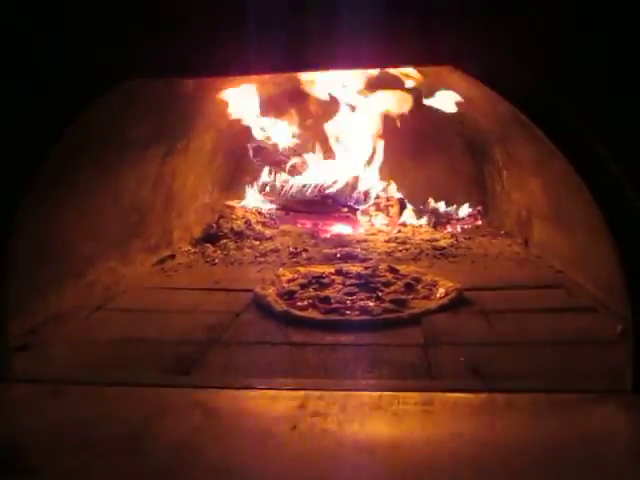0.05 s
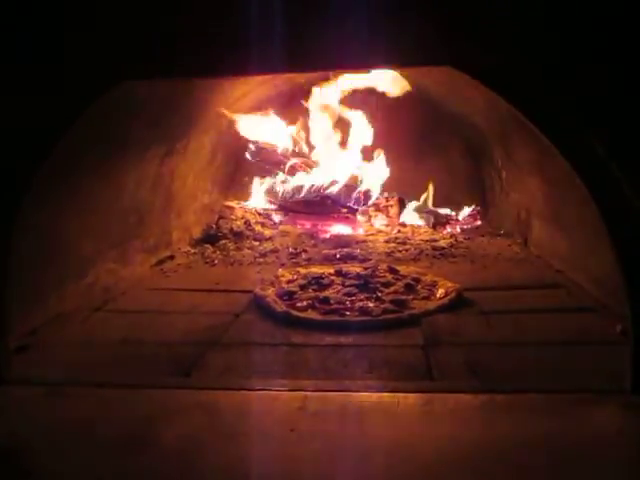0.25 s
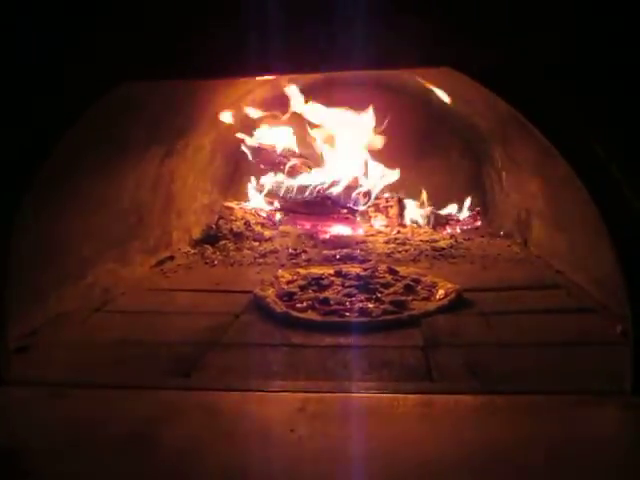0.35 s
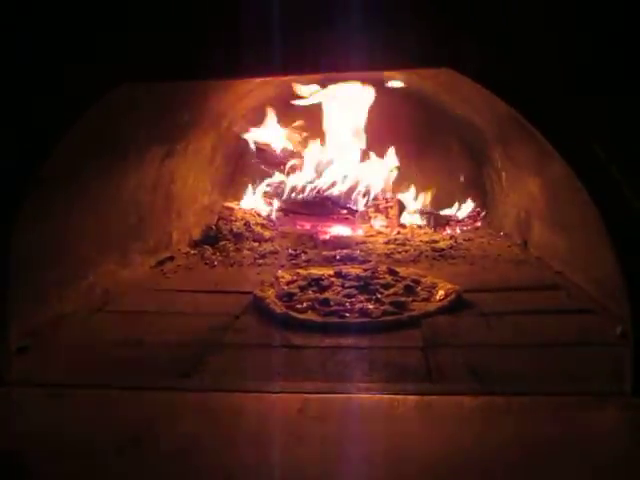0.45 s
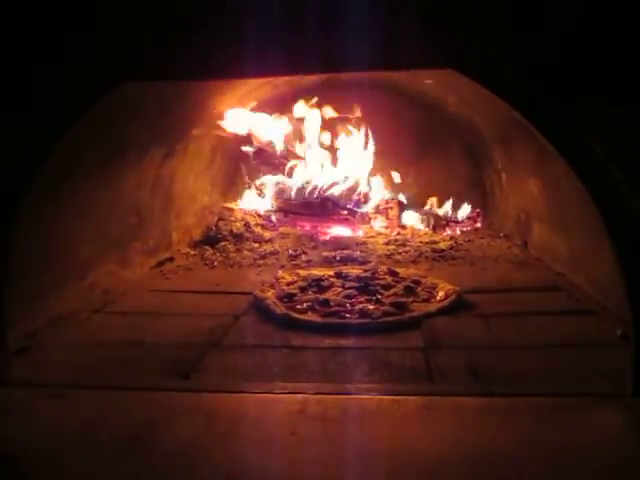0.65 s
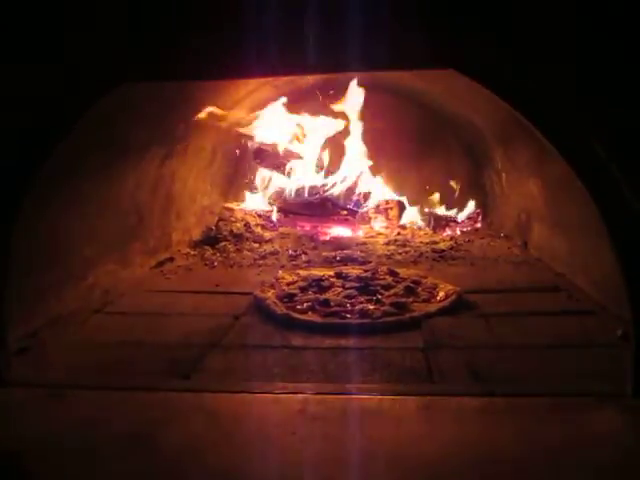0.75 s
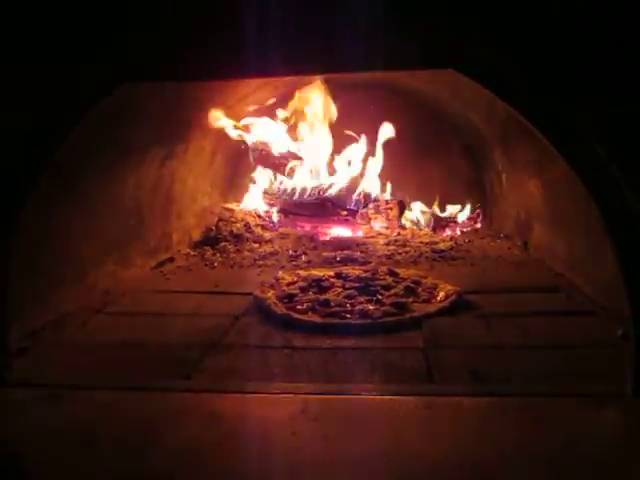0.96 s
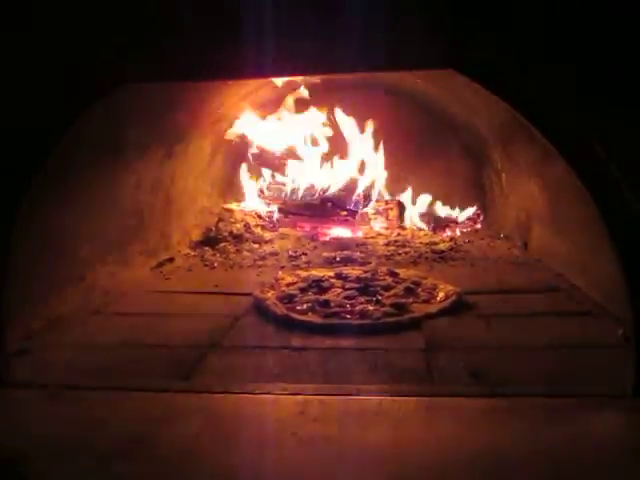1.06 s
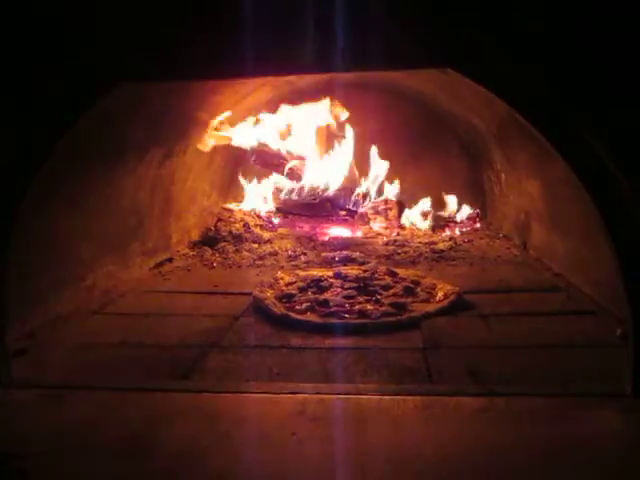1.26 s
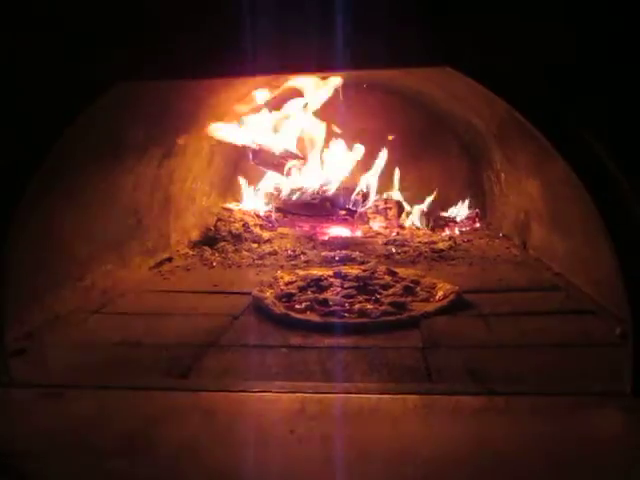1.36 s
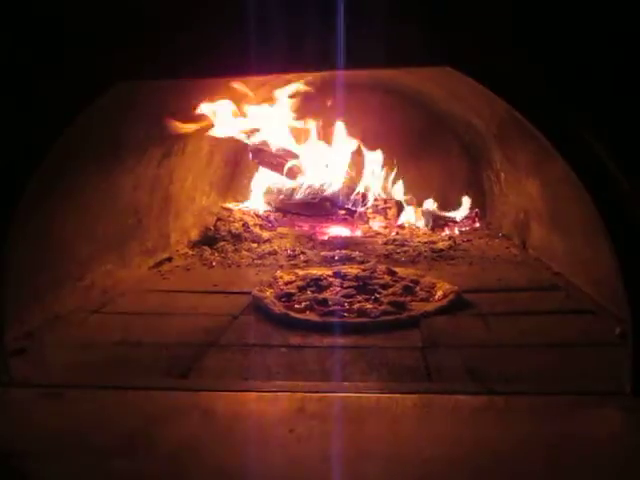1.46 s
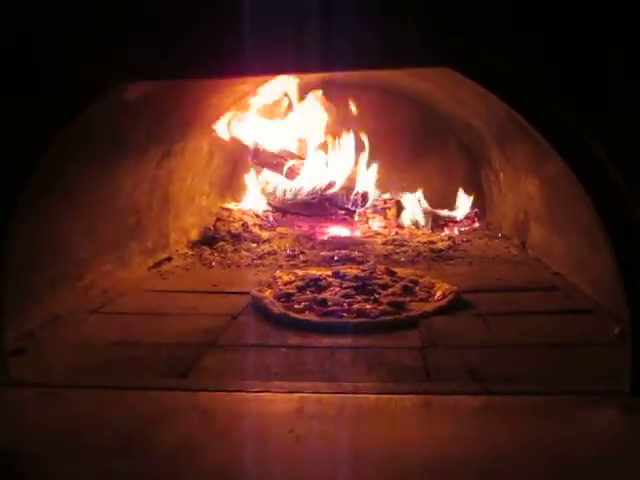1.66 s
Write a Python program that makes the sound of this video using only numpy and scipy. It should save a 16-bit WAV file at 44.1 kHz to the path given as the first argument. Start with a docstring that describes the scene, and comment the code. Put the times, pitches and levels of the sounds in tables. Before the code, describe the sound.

A wood fire crackles in a brick oven, with two very loud log pops early on

```python
"""In a domed brick oven burns a wood fire: low roar, soft hiss and fine sizzle, as filtered noise and ticks.
A log pops twice, very loudly, among smaller crackles; each is a spike, a noise burst and decaying echoes,
filtered by the resonances of the wood. The flames are stereo noise that follows a slow draught.
Gain control ducks the fire at the pops and lets it swell back over about a second; loud peaks clip."""
import sys
import numpy as np
from scipy import signal
from scipy.fft import rfft, irfft, next_fast_len
from scipy.io import wavfile
from scipy.ndimage import uniform_filter1d

SR = 44100
rng = np.random.default_rng(int(sys.argv[2]) if len(sys.argv) > 2 else 0)


def bounce(signal):
    """Save signal as a 16-bit WAV file at the path given by the first command-line argument."""
    frames = np.transpose(np.atleast_2d(signal))
    limited = np.clip(frames, -1, 1)
    pcm = np.round(limited * 32767).astype(np.int16)
    wavfile.write(sys.argv[1], SR, pcm)


N = 74970
SIZE = next_fast_len(N + SR // 2)   # transform length, with room for filter tails
HZ = np.maximum(np.arange(SIZE // 2 + 1) * SR / SIZE, 1)
T = np.arange(N) / SR

# spectrum of small splits in the wood: f/Hz, relative level/dB
SPLIT_SPECTRUM = [(100, -58), (900, 14), (2000, 1), (3200, 11.5), (7000, 16), (10000, 7.5), (13000, 2.5),
                  (16000, -14)]
CRACKLE_RIGHT_DB = -11   # right channel against left, for crackles and sizzle


def from_db(db):
    """Logarithmic level: 20 dB is a factor of ten in amplitude."""
    return 10 ** (np.asarray(db) / 20)


def curve(points):
    """Spectral envelope: a table of (f/Hz, value) interpolated over log frequency."""
    hz, value = np.transpose(points)
    return np.interp(np.log(HZ), np.log(hz), value)


def bump(hz, width_hz):
    """Resonance: a Lorentzian of height 1, with its full width at half height."""
    return 1 / (1 + (2 * (HZ - hz) / width_hz) ** 2)


def coloured(x, gain):
    """Minimum-phase filtering: folding the cepstrum gives a causal filter with this gain."""
    cepstrum = irfft(np.log(gain + 1e-9), SIZE)[:SIZE // 2]
    response = np.exp(rfft(2 * cepstrum, SIZE) - cepstrum[0])
    return irfft(rfft(x, SIZE) * response, SIZE)[..., :N]


def stereo_noise(alike):
    """Coherence: white noise in two channels that share the given fraction at each frequency."""
    left, other = rfft(rng.standard_normal((2, SIZE)))
    alike = np.clip(alike, 0, 1)
    right = alike * left + np.sqrt(1 - alike ** 2) * other
    return irfft(np.array([left, right]), SIZE)[:, :N]


def panned(x, right_db):
    """Interchannel level difference: the right channel is scaled against the left."""
    return x * from_db([[0], [right_db]])


def starting_at(x, s):
    """Pure delay: a sound is shifted to its moment."""
    delay = max(int(s * SR), 0)
    return np.pad(x, ((0, 0), (delay, 0)))[:, :N]


def flutter():
    """Low-pass noise: slow random wavering with zero mean and spread 1."""
    half_amplitude_hz = 26
    slow = irfft(rfft(rng.standard_normal(SIZE)) / (1 + (HZ / half_amplitude_hz) ** 2), SIZE)[:N]
    return (slow - slow.mean()) / slow.std()


def evened(x):
    """Spectral whitening: division by the smoothed spectrum leaves about unit energy."""
    smooth_hz = 450
    power = np.abs(rfft(x, SIZE)) ** 2
    for _ in range(3):
        power = uniform_filter1d(power, size=int(smooth_hz * SIZE / SR))
    return coloured(x, 1 / np.sqrt(power))


def crack():
    """Impulsive fracture: a spike, a burst of tearing fibres, then duller decaying echoes."""
    # reverberation of the dome, then the room: starting level/dB, t60/s
    decays = [(-7, 0.043), (-37.5, 0.27)]
    burst_s, spike_db = 0.0017, 10.5   # spike against the unit noise of the burst
    alike_hz, dull_hz = 3800, 7750   # channels differ above the first; bricks return less above the second
    alike = 1 / (1 + (HZ / alike_hz) ** 2)
    burst = stereo_noise(alike) * np.exp(-.5 * (T / burst_s) ** 4)
    burst[:, 0] = from_db(spike_db)
    fading = np.sqrt(sum(from_db(db - 60 * T / t60) ** 2 for db, t60 in decays))
    low_pass = signal.butter(1, dull_hz, fs=SR)
    echoes = signal.lfilter(*low_pass, stereo_noise(alike) * fading)
    return np.array([evened(side) for side in burst + echoes])


def pops():
    """Pressure release and modal ringing: a puff of gas escapes, then the log cracks and rings."""
    # gas pockets bursting in a log: t/s, level before colouring/dB, bass boost/dB, puff of gas/dB
    pockets = [(0.2185, 24, 0.5, -1.5), (0.2635, 23.5, -7, -11)]
    # spectrum of a pop: f/Hz, relative level/dB
    pop_spectrum = [(40, -10.5), (200, -11.5), (500, -3), (760, -10), (1900, -2.5), (2500, -7.5),
                    (3300, -2), (5200, -6), (8000, -6), (10000, 1), (12500, -12), (16000, -19)]
    # resonances of the log: f/Hz, width/Hz, boost/dB
    log_modes = [(910, 260, 6), (1515, 220, 4), (2870, 340, 10), (3620, 130, 2.5), (4340, 300, 7.5),
                 (5780, 350, 11.5), (6130, 110, 1), (6650, 210, 4.5), (7570, 380, 8), (10020, 290, 0),
                 (10270, 790, -7)]
    # right channel against left: f/Hz, level/dB
    right_spectrum = [(200, -10.5), (1200, -11.5), (2600, -6.3), (6000, -11), (11000, -10)]
    bass_hz = 2000
    puff_decay_s, puff_lead_s = 0.00037, 0.00063   # gas escapes this long before the crack
    log_db = curve(pop_spectrum) + sum(db * bump(hz, width) for hz, width, db in log_modes)
    bass = 1 / (1 + (HZ / bass_hz) ** 4)
    puff = -np.exp(-T / puff_decay_s) * np.ones((2, 1))
    out = 0
    for s, db, bass_db, puff_db in pockets:
        ringing = coloured(crack(), from_db(db + log_db + bass_db * bass))
        out = out + starting_at(ringing, s)
        out = out + starting_at(from_db(puff_db) * puff, s - puff_lead_s)
    return np.array([out[0], coloured(out[1], from_db(curve(right_spectrum)))])


def crackles():
    """Resonance under impact: each small split, bright or dull, rings a splinter at its own pitch."""
    # splits: t/s, level/dB, splinter f/Hz, resonance width/Hz, its height/dB, treble tilt/dB per octave
    splits = [(0.0686, -28.5, 11700, 2940, 21, -4), (0.1856, -34, 6460, 900, 0, 6),
              (0.4371, -19, 7400, 2500, 0, 2), (0.485, -8, 3140, 1290, 10, -4.5),
              (0.5164, -25, 3000, 900, 3, 3), (0.5673, -18, 6370, 900, 9, -5),
              (0.5903, -3.5, 5120, 650, 13, 2.5), (0.6054, -14, 5150, 500, 12, 5),
              (0.6989, -24, 3930, 905, 9, -5), (0.7878, -22, 10640, 705, 30, 0),
              (0.8265, -14.5, 2600, 1205, 18, 4.5), (1.0225, -24, 2840, 900, 12, 4),
              (1.068, -16.5, 6130, 606, 14, -1), (1.263, -22.5, 5270, 1200, 9, 10),
              (1.4273, -29, 10500, 2000, 12, 11), (1.5201, -22, 3370, 1400, 7, -4),
              (1.5386, -18, 2870, 1000, 10, -0.5), (1.554, -31, 14200, 900, 20, 10)]
    tilt_from_hz = 2400
    colour_db = curve(SPLIT_SPECTRUM)
    octaves = np.log2(np.maximum(HZ / tilt_from_hz, 1))
    out = 0
    for s, db, hz, width_hz, ring_db, tilt_db in splits:
        gain = from_db(colour_db + ring_db * bump(hz, width_hz) + tilt_db * octaves)
        gain = gain / np.sqrt(np.mean(gain ** 2))   # equal energy before the level is set
        out = out + starting_at(coloured(crack(), from_db(db) * gain), s)
    return panned(out, CRACKLE_RIGHT_DB)


def sizzle():
    """Random point process: tiny independent ticks from the embers, all of one crack shape."""
    ticks_per_s = 60
    least_db, spread_db = -42, 2.0   # before colouring; exponential spread upward, capped at 3 times
    born = rng.random(N) < ticks_per_s / SR
    sizes = from_db(least_db + spread_db * np.minimum(rng.exponential(1, N), 3))
    ticks = signal.fftconvolve((born * sizes)[None], crack(), axes=1)[:, :N]
    return panned(coloured(ticks, from_db(curve(SPLIT_SPECTRUM))), CRACKLE_RIGHT_DB)


def flames():
    """Turbulent combustion noise: rumble, roar and gas hiss follow the draught; flares swell the rumble."""
    # spectral density of the flames: f/Hz, level/dB per Hz
    roar_spectrum = [(10, -76), (28, -77), (46, -60), (57, -58.5), (84, -53.5), (100, -62.5), (125, -64),
                     (165, -71), (200, -69), (350, -77), (550, -78.5), (1000, -83), (1230, -86.5),
                     (1470, -84.5), (2000, -96.5), (5000, -113)]
    # spectral density of escaping gas: f/Hz, level/dB per Hz
    hiss_spectrum = [(200, -101), (1500, -88.5), (2500, -91.5), (3100, -89), (3900, -91.5), (6500, -93.5),
                     (10000, -95.5), (12000, -101), (15500, -104.5)]
    # left-right likeness: f/Hz, coherence/0-1
    likeness = [(60, 0.93), (300, 0.96), (700, 0.64), (1500, 0.25), (3100, 0.23), (12000, 0.01)]
    # strength of the flames: t/s, level/dB
    draught = [(0, 0), (.18, 1.64), (.38, -2.8), (.52, -2.1), (.66, -1), (.8, 0.2), (.95, 0.2), (1.1, -0.5),
               (1.25, 0.2), (1.42, 1), (1.55, 1.3), (1.7, 1.4)]
    # flares: t/s, swell of the rumble/dB
    flares = [(0.05, 4.5), (0.19, 3.5), (0.34, 4.5), (0.51, 4.5), (0.595, 3.5), (0.77, 0), (0.95, 2.5),
              (1.212, 9.5), (1.409, 5.5), (1.485, 2), (1.58, -0.5)]
    flare_s, flutter_db = 0.017, 1.1   # standard deviations
    rumble_db, rumble_below_hz = -2.5, 150
    roar_right_db, hiss_right_db = -9, -8
    draught_db = np.interp(T, *np.transpose(draught))
    alike = curve(likeness)
    per_hz = np.sqrt(SR / 2)   # unit white noise to unit density
    flare_db = sum(db * np.exp(-.5 * ((T - s) / flare_s) ** 2) for s, db in flares)
    low = 1 / (1 + (HZ / rumble_below_hz) ** 6)   # share of the power that is rumble
    colour = per_hz * from_db(curve(roar_spectrum))
    rumble = coloured(stereo_noise(alike), colour * np.sqrt(low))
    rumble = rumble * from_db(rumble_db + flare_db)
    roar = coloured(stereo_noise(alike), colour * np.sqrt(1 - low))
    roar = roar * from_db(flutter_db * flutter())
    hiss = coloured(stereo_noise(alike), per_hz * from_db(curve(hiss_spectrum)))
    strength = from_db(draught_db)
    return panned((rumble + roar) * strength, roar_right_db) + panned(hiss * strength, hiss_right_db)


def scene():
    """Superposition: everything that sounds in the oven adds."""
    return pops() + crackles() + sizzle() + flames()


def gain_control(x):
    """Dynamic compression: peaks in the left channel duck both; the gain holds, then creeps back."""
    threshold_db, max_duck_db = -25, 8.5
    attack_s, hold_s, release_s = 0.0042, 0.1, 0.34
    level_db = 10 * np.log10(np.maximum(uniform_filter1d(x[0] ** 2, size=32), 1e-12))
    over_db = np.clip(level_db - threshold_db, 0, max_duck_db)
    fading = np.exp(-T / release_s)
    released = np.maximum.accumulate(over_db / fading) * fading
    # the release as it stood one hold time earlier, never above the deepest duck so far
    late_release = released * np.exp(hold_s / release_s)
    held = np.maximum(released, np.minimum(np.maximum.accumulate(over_db), late_release))
    r = np.exp(-1 / (attack_s * SR))
    duck_db = signal.lfilter([1 - r], [1, -r], held)
    return x * from_db(-duck_db)


def record(dry):
    """Nonlinear overload: gain control and two narrow treble notches, then clipping and a steep top cut."""
    # notches: f/Hz, width/Hz
    notches = [(5900, 310), (7850, 360)]
    cutoff_hz = 16000
    x = gain_control(dry)
    for hz, width_hz in notches:
        x = signal.lfilter(*signal.iirnotch(hz, hz / width_hz, fs=SR), x)
    top_cut = 1 / (1 + (HZ / cutoff_hz) ** 120)
    return irfft(rfft(np.clip(x, -1, 1), SIZE) * top_cut, SIZE)[:, :N]


dry = scene()
out = record(dry)
bounce(out)
```